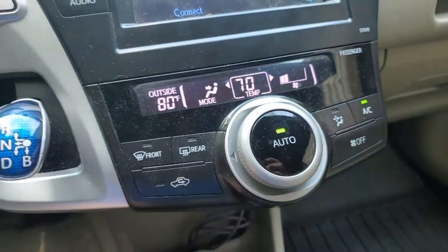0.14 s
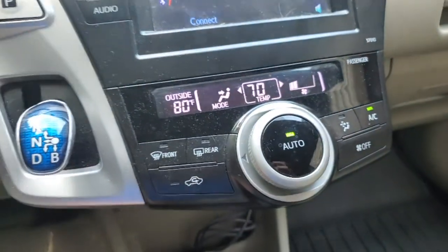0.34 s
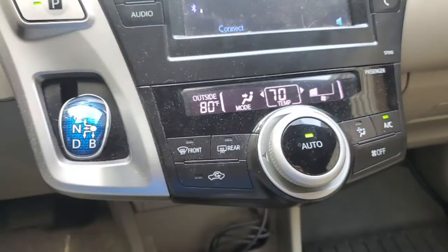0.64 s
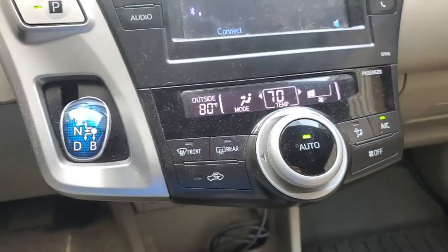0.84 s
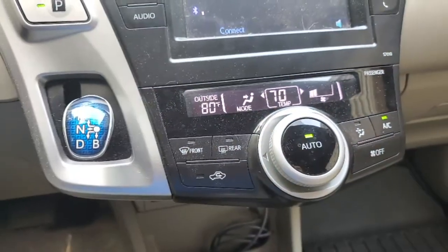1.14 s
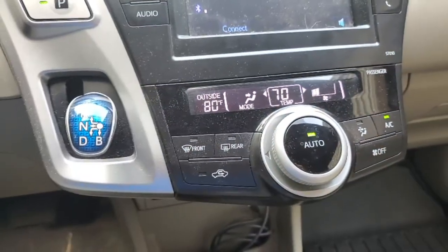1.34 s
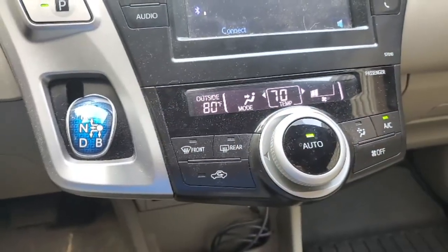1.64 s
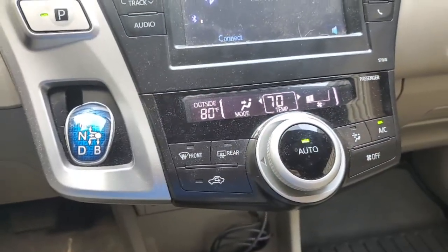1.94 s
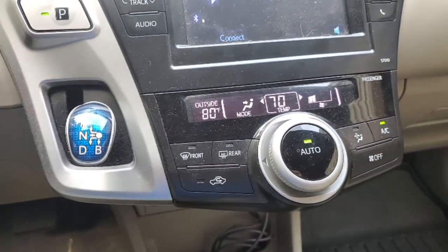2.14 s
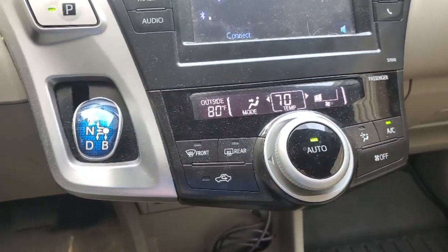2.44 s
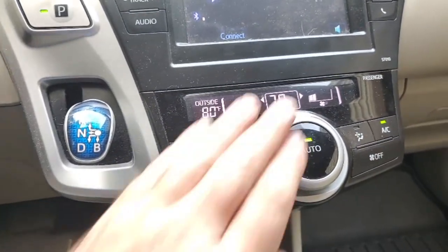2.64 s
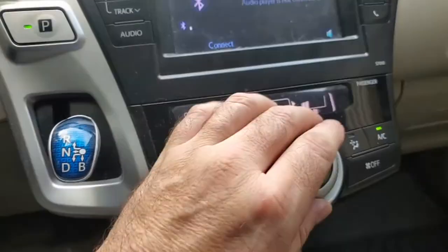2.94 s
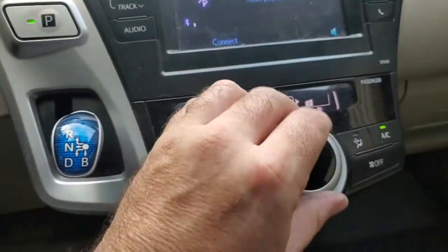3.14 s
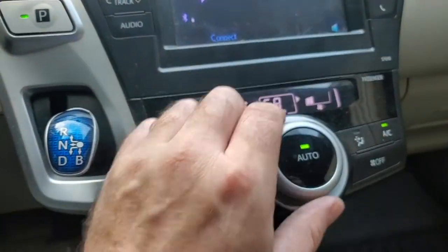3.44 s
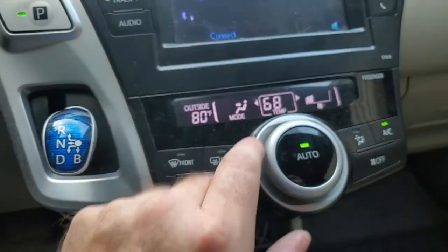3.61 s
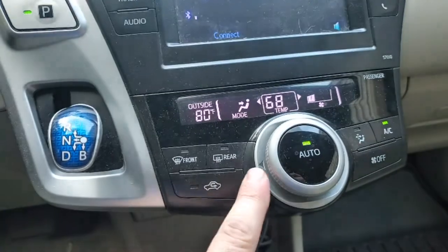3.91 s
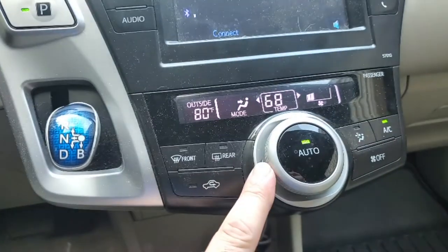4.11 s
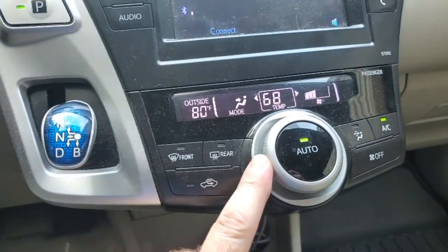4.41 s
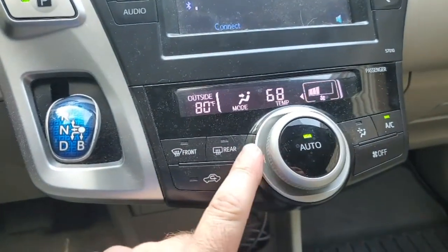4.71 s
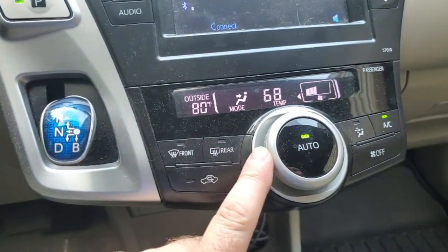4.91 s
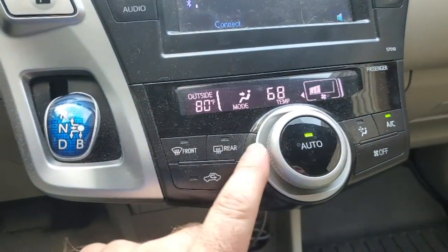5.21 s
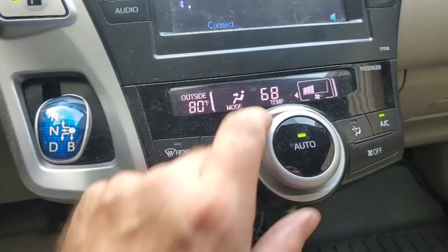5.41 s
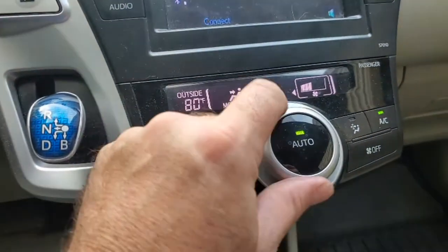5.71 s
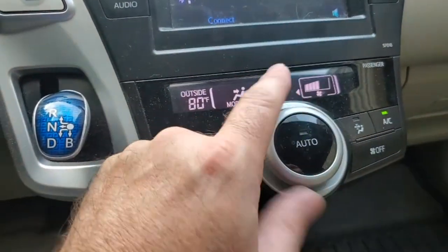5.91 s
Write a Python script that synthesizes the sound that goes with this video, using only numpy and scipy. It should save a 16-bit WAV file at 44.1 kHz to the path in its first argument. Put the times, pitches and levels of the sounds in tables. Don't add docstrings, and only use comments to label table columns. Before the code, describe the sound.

The inside of a parked car, heard close from a handheld stereo microphone, dry with a very short padded echo. A strong, very low compressor hum holds almost steady throughout, under a soft ducted rumble and gentle vent rush with a faint fan tone. Light skin or cloth brushing comes around 0.3 s, and a small bump with a tiny crackle at 0.6 s; faint rustles continue. From about 2.85 s fingertips tap and brush the panel, then a dial gives two sharp, bright plastic clicks at 3.25 and 3.35 s. Faint finger rubbing near 4 s precedes a soft double-contact button press at 4.55 s, released at 4.7 s, and a second at 5.1 s, released at 5.25 s. From 4 s the blower gradually speeds up, its tone climbing and air growing louder and brighter. A light touch at 5.7 s leads to two quick snaps near 5.85 and 5.9 s, while the airflow continues to the end.

```python
import sys
import numpy as np
from scipy import signal
from scipy.fft import rfft, irfft, next_fast_len
from scipy.io import wavfile
from scipy.ndimage import uniform_filter1d, map_coordinates

SR = 44100
rng = np.random.default_rng(int(sys.argv[2]) if len(sys.argv) > 2 else 0)


def natural_amplitude(level_db):
    exponent = np.asarray(level_db, float) / 20
    return 10 ** exponent


def log_audio(samples):
    frames = np.atleast_2d(samples).T
    limited = np.clip(frames, -1, 1)
    pcm = np.round(limited * 32767).astype(np.int16)
    wavfile.write(sys.argv[1], SR, pcm)


N = 266937

QUIET_TOP_HZ, EDGE_HZ = 15780, 120


def unit(x):
    return x / np.sqrt(np.mean(x ** 2) + 1e-20)


def along(points, hz):
    f, v = np.transpose(points)
    return np.interp(np.log(hz + 1), np.log(f + 1), v)


def curves(rows):
    s, *cols = np.transpose(rows)
    return [np.interp(np.arange(N) / SR, s, c) for c in cols]


def wobble(rate):
    knots = rng.standard_normal(int(N * 40 / SR) + 4)
    return map_coordinates(knots, [np.arange(N) * min(rate, 40) / SR])


def filtered(x, response):
    n = x.shape[-1]
    m = next_fast_len(n + 4096)
    return irfft(rfft(x, m) * response(np.fft.rfftfreq(m, 1 / SR)), m)[..., :n]


def band(x, lo_hz, hi_hz):
    sos = signal.butter(2, [lo_hz, hi_hz], "bandpass", fs=SR, output="sos")
    return unit(signal.sosfilt(sos, x))


def rush(spectrum, alike, patchy_db):
    z = signal.stft(rng.standard_normal((2, N)), nperseg=512)[2]
    field = uniform_filter1d(rng.standard_normal(z.shape[1:]), size=6, axis=0)
    field = uniform_filter1d(field, size=14, axis=1)
    pair = signal.istft(z * natural_amplitude(patchy_db * unit(field)), nperseg=512)[1][:, :N]

    def mid_side_gain(hz):
        turn = np.arccos(np.clip(along(alike, hz), -1, 1)) / 2
        return natural_amplitude(along(spectrum, hz)) * [np.cos(turn), np.sin(turn)]

    mid, side = filtered(pair, mid_side_gain)
    return unit(np.array([mid + side, mid - side]))


def add(track, s, sound, pan_db):
    start = round(s * SR)
    track[:, start:start + sound.shape[-1]] += sound * natural_amplitude([[pan_db / 2], [-pan_db / 2]])


def compressor():
    # t/s, level/dB
    load = [(0.12, -22.5), (0.15, -22.5), (1.7, -21.5), (1.73, -22), (2.24, -21), (2.28, -23), (2.86, -21),
            (3.53, -22.5), (5.71, -22), (5.9, -21.5)]
    # multiple of the shaft speed, level/dB, drift/dB
    overtone_table = [(2, -22, 1.5), (3, -31, 2.5), (4, -35, 1.5), (6, -34, 2.5), (7, -31, 1.2),
                      (9, -37, .8)]
    # t/s, f/Hz
    shaft = [
        (0, 43.3),
        (.7, 43.3),
        (.9, 43.41),
        (3.3, 43.42),
        (3.5, 43.26),
        (4.2, 43.26),
        (4.4, 43.37),
        (6.05, 43.37),
    ]
    start_angle = 2.75
    shaft_hz = curves(shaft)[0] + 0.04 * wobble(3.04)
    turn = 2 * np.pi * np.cumsum(shaft_hz) / SR + start_angle
    tones = np.sin(turn)
    for k, db, drift_db in overtone_table:
        tones = tones + natural_amplitude(db + drift_db * wobble(5.8)) * np.sin(k * turn + rng.uniform(0, 7.42))
    buzz = natural_amplitude([[-60], [-50]]) * natural_amplitude(1.5 * wobble(4)) * np.sin(25 * turn)
    hum_db = curves(load)[0] + .3 * wobble(6)
    return np.sqrt(2) * natural_amplitude(hum_db) * (tones + buzz) * natural_amplitude([[-.1], [.1]])


def blower():
    # f/Hz, level/dB per Hz
    duct = [(15, -29.5), (30, -16), (60, -16.5), (95, -14), (130, -15), (160, -24), (190, -27), (250, -23),
            (290, -22.5), (325, -24.5), (342, -30), (420, -39), (520, -40), (800, -96)]
    # f/Hz, level/dB per Hz
    vents = [(300, -13.5), (420, -6), (520, -12.5), (610, -4.5), (700, -9.5), (830, -7), (1000, -15.5),
             (1250, -18.5), (1750, -21.5), (2050, -26.5), (2600, -31.5), (3200, -31), (3800, -36.5),
             (6500, -59)]
    # f/Hz, likeness (1 = same)
    alike = [(60, .98), (130, .92), (290, .87), (500, .9), (800, .85), (1100, .3), (1500, .05), (4000, .08)]
    # t/s, f/Hz
    wheel_speed = [
        (0, 278),
        (3.9, 277),
        (4.4, 292),
        (4.85, 305),
        (5.3, 318),
        (5.7, 326),
        (6.05, 328),
    ]
    idle_hz = 277
    wheel_hz, = curves(wheel_speed)
    speed_db = 20 * np.log10(wheel_hz / idle_hz)
    rumble_db = -40 + 2.54 * speed_db
    rush_db = -51 + 3.56 * speed_db
    bright_db = 0.5 + 3.4 * speed_db
    tone_db = -54.5 + 2.6 * speed_db

    swell = wobble(2.1)
    rumble = natural_amplitude(rumble_db + 0.4 * swell) * rush(duct, alike, patchy_db=1.42)
    vent = rush(vents, alike, patchy_db=1.19)
    top = filtered(vent, lambda hz: 1 / (1 + (1900 / (hz + 1)) ** 6))
    air_gain = natural_amplitude(rush_db + .35 * swell + 0.13 * wobble(11))
    air = air_gain * (vent - top + natural_amplitude(bright_db) * top)

    angle = 2 * np.pi * np.cumsum(wheel_hz) / SR
    wheel = natural_amplitude(tone_db + 1.5 * wobble(3.7)) * np.sin(angle)
    motor = natural_amplitude(tone_db - 3 + 3.4 * wobble(3)) * np.sin(.775 * angle)
    return rumble + air + wheel + motor


def dial():
    # t/s, peak level/dB, left over right/dB, ring/dB, settling/dB
    detents = [
        (3.24, -21.5, -3.5, 0.5, -8),
        (3.3548, -20, 1.5, 2, -9),
        (5.853, -19.5, -0.5, 0.5, -10.5),
        (5.9162, -18.5, 1.5, 0, -10.5),
    ]
    ring_hz = [980, 1400, 1980, 2790, 3365, 4300, 4870, 5650, 6500, 8500, 11000, 12800]
    # turned one way left/dB, right/dB, turned back left/dB, right/dB, t60/s
    knob_modes = [(-7, -10, -13, -10, 0.052), (-11, -9, -26, -18, 0.034), (-24, -24, -16, -7, .035),
                  (-12, -23, -5, -8, 0.021), (-5, 5.5, 5.5, 4, 0.031), (-1, 3.5, -9, -3.5, 0.014),
                  (-12, -11, -8, -6, 0.028), (-11, -2, -14, -10, .028), (-14, -7, -13, -20, .035),
                  (-8, -1, -22, -15, .03), (-6, -5.5, -8, -3.5, 0.024), (-9, -6, -21, -10, .022)]
    # f/Hz, level/dB per Hz
    snap = [(410, -28), (850, -14), (1000, -10.5), (1830, -15.5), (2200, -20), (3360, -13), (4800, -13.5),
            (6330, -11.5), (6940, -13), (8600, -11), (10500, -15), (12400, -14), (15600, -21.5),
            (16300, -20)]
    # f/Hz, level/dB per Hz
    snap_back = [(410, -33), (700, -9.5), (1400, -12), (2200, -19.5), (2800, -13.5), (3940, -10),
                 (5000, -14), (6330, -10.5), (7500, -13.5), (8600, -16), (10900, -8), (12600, -21),
                 (15600, -22), (16300, -27)]
    # f/Hz, level/dB, t60/s
    bezel_modes = [(3330, -20, .065), (3425, -23, .06), (6500, -27, .05)]
    # t/s, level/dB
    catches = [
        (3.228, -53),
        (5.8425, -48),
    ]
    chatter_t60, settle_t60 = 0.031, 0.079
    slip_s, slip_sag_db = .0065, 4
    grip_damping = .24
    unlike = .45
    track, t = np.zeros((2, N + SR)), np.arange(SR // 8) / SR

    for k, (s, db, pan_db, ring_db, settle_db) in enumerate(detents):
        back = k // 2
        chatter = natural_amplitude(-60 * t / chatter_t60) + natural_amplitude(settle_db - 60 * t / settle_t60)
        chatter = (1 - np.exp(-t / 0.00094)) * chatter
        noise = rng.standard_normal((2, len(t))) + 1.1 * rng.standard_normal(len(t))
        hiss = unit(filtered(noise, lambda hz: natural_amplitude(along([snap, snap_back][back], hz))))

        ring = np.zeros((2, len(t)))
        for hz, (*levels, t60) in zip(ring_hz, knob_modes):
            both_db = np.c_[levels[2 * back:][:2]]
            fade_db = 60 * np.maximum(t - slip_s, 0) / (t60 * grip_damping)
            cycles = hz * t + rng.random() + unlike * rng.random((2, 1))
            ring += natural_amplitude(both_db - fade_db) * np.sin(2 * np.pi * cycles)
        drive = natural_amplitude(slip_sag_db * (.5 - np.minimum(t / slip_s, 1)))
        rattle = 1 + [.22, .35][back] * band(rng.standard_normal(len(t)), 60, 680)
        ring = ring * (1 - np.exp(-t / 0.00055)) * drive * rattle
        add(track, s, natural_amplitude(db - 2.0) * (0.64 * chatter * hiss + natural_amplitude(ring_db - 12.0) * ring), pan_db)

        bezel = np.zeros((2, len(t)))
        for hz, level, t60 in bezel_modes:
            bezel += natural_amplitude(level - 60 * t / t60) * np.sin(2 * np.pi * (hz * t + rng.random((2, 1))))
        add(track, s, natural_amplitude(db - 18 * back) * (1 - np.exp(-t / .004)) * bezel, pan_db - 8)

    for s, db in catches:
        ping = natural_amplitude(db - 60 * t / .03) * (1 - np.exp(-t / .001)) * np.sin(2 * np.pi * 4250 * t)
        add(track, s, ping, -4)
    return track[:, :N]


def fingers():
    # t/s, peak level/dB, low part/dB, high part/dB
    touches = [(2.854, -41, 8.5, -16), (2.9596, -43.5, -3, -20), (3.0157, -52, 14.5, -6),
               (3.199, -57, 6, -1), (3.3153, -39, -2, -20), (3.47, -55, 12, -13), (4.183, -55.5, 18.5, -12),
               (4.528, -46, 6, -31), (4.639, -49.5, 8, -9.5), (5.709, -45.5, 4, -12)]
    # t/s, peak level/dB, second contact after/s, its level over the first/dB, high part/dB
    presses = [
        (4.5515, -32.5, .015, -5.5, -15.5),
        (5.104, -39.5, 0.0056, 2, -23.5),
    ]
    releases = [
        (4.685, -38.5, 0.008, 3.5, -9.5),
        (5.2366, -37, .0035, 2.7, -8),
    ]
    second_high = [4, 1, -10, -7]
    # f/Hz, level/dB, delay/s, t60/s
    rebound = [(310, -32, .008, .045), (410, -35, .012, .035), (500, -32, .013, .04), (590, -35, .015, .03),
               (4150, -38, .009, .014)]
    rebound_top = [1, .86]
    track, t = np.zeros((2, N + SR)), np.arange(SR // 6) / SR

    # t/s, peak, low, high, 5-6 kHz body (all dB), t60/s, attack/s
    puffs = [(*row, -12, 0.053, .0019) for row in touches]
    for (s, db, lag, more_db, high_db), second_db in zip(presses + releases, second_high):
        puffs.append((s, db + 1.5, 2.5, high_db, -5.5, 0.037, 0.0013))
        puffs.append((s + lag, db + 1.5 + more_db, 2.5, high_db + second_db, -5.5, 0.037, 0.0013))

    for s, db, low_db, high_db, body_db, t60, attack in puffs:
        low, mid, body, high = rng.standard_normal((4, 2, len(t))) + rng.standard_normal((4, 1, len(t)))
        puff = band(mid, 2750, 4800) + natural_amplitude(low_db) * band(low, 630, 1880)
        puff = puff + natural_amplitude(body_db) * band(body, 4900, 6800)
        treble = band(high, 6500, 11800) + natural_amplitude(-5) * band(high, 14500, 16400)
        puff = puff + natural_amplitude(high_db + 11.0) * unit(treble)
        add(track, s, natural_amplitude(db - 8.5 - 60 * t / t60) * (1 - np.exp(-t / attack)) * puff, 0)

    for (s, *_), top in zip(releases, rebound_top):
        for hz, db, delay, t60 in rebound:
            pitch = hz * (top if hz > 1000 else 1)
            add(track, s + delay, natural_amplitude(db - 60 * t / t60) * np.sin(2 * np.pi * pitch * t), 0)
    return track[:, :N]


def hand():
    # t/s, level/dB
    sleeve = [(0, -72), (.9, -68), (1.4, -70), (2.4, -71.5), (2.8, -61.5), (3.2, -69), (3.7, -67.5),
              (4.4, -69.5), (5.4, -67.5), (5.75, -63.5), (6.05, -66)]
    # f/Hz, level/dB per Hz
    cloth_colour = [(1200, -23.5), (2200, 1), (4500, -2), (5800, -1), (7000, -2.5), (9900, -7.5),
                    (10500, -3.5), (11600, -5.5), (12500, -8.5), (14400, -11), (16000, -7)]
    # t/s, half length/s, level/dB, centre f/Hz, width/octaves
    brushes = [(0.325, 0.09, -55, 3200, 1.54), (0.32, .06, -56.5, 2800, .75), (.272, .02, -60, 3400, .7),
               (.39, .03, -63, 4200, .8), (2.965, .003, -61, 4200, .1), (2.963, .003, -63, 5600, .15),
               (0.649, 0.038, -56, 9600, 4.1), (.665, .045, -63.5, 3300, .6),
               (0.865, 0.025, -67.5, 6180, 0.68), (0.98, 0.22, -72, 3180, 0.09),
               (1.05, 0.041, -68.5, 7940, 1.1), (1.38, 0.015, -66, 8130, 0.88),
               (1.632, 0.027, -61.5, 10840, 1.6), (2.947, 0.039, -62, 10970, 0.85),
               (3.084, 0.024, -66.5, 10900, 0.51), (3.313, 0.018, -58, 8050, 3.6),
               (3.312, .006, -58, 13000, .3), (3.487, 0.012, -59, 5600, 0.75),
               (3.482, .009, -64, 11000, .3), (3.658, 0.04, -62.5, 11650, 0.46),
               (2.905, .012, -63, 3600, .25), (5.732, 0.0054, -59, 3500, .25),
               (3.024, .004, -63, 5700, .06), (5.891, .012, -55, 9000, 1.2),
               (5.719, 0.017, -59.5, 10830, 0.99)]
    # t/s, level/dB
    rubs = [
        (3.985, -76),
        (4.04, -80),
        (4.062, -79),
        (4.105, -78),
        (4.87, -77),
    ]
    level_db, = curves(sleeve)
    cloth = rush(cloth_colour, [(3000, 0.13)], patchy_db=0.5)
    top = filtered(cloth, lambda hz: 1 / (1 + (8000 / (hz + 1)) ** 8))
    cloth = cloth - top + natural_amplitude(-2.5) * top
    track = np.pad(natural_amplitude(level_db + .8 * wobble(12)) * cloth, ((0, 0), (0, SR)))

    strokes = list(brushes)
    for s, db in rubs:
        for hz, more_db in ((5900, 9), (11000, 2)):
            strokes.append((s, 0.016, db + more_db, hz, 0.1))
    t = np.arange(SR // 2) / SR
    drag = natural_amplitude(.5 * np.pad(wobble(35), (0, SR)))
    for s, half, db, centre_hz, octaves in strokes:
        colour = lambda hz: np.exp(-.5 * (np.log2((hz + 1) / centre_hz) / octaves) ** 2)
        start = max(s - .25, 0)
        stroke = np.exp(-.5 * ((t + start - s) / half) ** 2) * drag[round(start * SR):][:len(t)]
        noise = unit(filtered(rng.standard_normal((2, len(t))), colour))
        add(track, start, natural_amplitude(db) * stroke * noise, 0)
    return track[:, :N]


def grip():
    # t/s, jolt/dB, crackle/dB
    slips = [
        (0.5906, -27.5, -38.5),
    ]
    creep_s, recover_s = .004, 0.0014
    crackle_lead_s, crackle_s = 0.0018, 0.00036
    track, t = np.zeros((2, N + SR)), np.arange(-SR // 50, SR // 50) / SR
    for s, jolt_db, crackle_db in slips:
        creep = np.clip(1 + t / creep_s, 0, 1) / 2
        jolt = np.where(t < 0, creep, -np.exp(-abs(t) / recover_s) / 2)
        burst = np.exp(-.5 * ((t + crackle_lead_s) / crackle_s) ** 2)
        crackle = burst * band(rng.standard_normal(len(t)), 5800, 13000)
        add(track, s + t[0], natural_amplitude(jolt_db) * jolt + natural_amplitude(crackle_db) * crackle, 0)
    return track[:, :N]


def cabin(x):
    # f/Hz, t60/s
    ring_time = [(500, .09), (3300, .075), (12000, .06)]
    hz, t, z = signal.stft(rng.standard_normal((2, SR // 5)), SR, nperseg=128)
    fade = natural_amplitude(-60 * t / along(ring_time, hz)[:, None])
    tail = signal.istft(z * fade, SR, nperseg=128)[1]
    return signal.fftconvolve(x, tail / np.linalg.norm(tail[0]), axes=1)[:, :N]


def whine():
    whine_hz = [15003, 15735]
    # left/dB, right/dB
    whine_levels = [(-73.5, -101), (-97, -82.5)]
    t, tones = np.arange(N) / SR, np.zeros((2, N))
    for hz, (left_db, right_db) in zip(whine_hz, whine_levels):
        gain = natural_amplitude([left_db + 3 * wobble(14), right_db + 4 * wobble(11)])
        tones += np.sqrt(2) * gain * np.sin(2 * np.pi * hz * t)
    skirt = filtered(rng.standard_normal(N), lambda hz: np.exp(-.5 * ((hz - whine_hz[0]) / 230) ** 2))
    tones[0] += natural_amplitude(-85 + 4 * wobble(16)) * unit(skirt)
    return tones


def scene():
    soft = lambda x: filtered(x, lambda hz: np.clip((QUIET_TOP_HZ - hz) / EDGE_HZ + .5, 0, 1))
    controls = dial() + soft(fingers())
    background = soft(blower() + hand() + grip())
    return compressor() + background + controls + natural_amplitude(-7.5) * cabin(controls)


def top_cut(x):
    return signal.sosfilt(signal.butter(12, 16490, fs=SR, output="sos"), x)


def record(dry):
    # f/Hz, gain/dB
    port_l = [(45, .5), (70, 1.5), (170, -1.5), (300, 0), (1000, 2), (3000, -1), (4000, -4.5), (5300, -5.5),
              (5900, -9.5), (7000, -21), (7500, -24.5), (8100, -5), (11000, -6), (15000, 4)]
    # f/Hz, gain/dB
    port_r = [(300, 0), (1000, 3.5), (2500, 1), (3250, 4), (3800, 3.5), (6500, 3.5), (8800, -3), (11000, 6),
              (13000, 1.5), (15000, 1.5)]
    top_hz = 16450

    def ports(hz):
        colour = natural_amplitude([along(port_l, hz), along(port_r, hz)])
        shelf = natural_amplitude(-15 * np.clip((hz - QUIET_TOP_HZ) / (4 * EDGE_HZ), 0, 1))
        return colour * shelf * np.clip((top_hz - hz) / EDGE_HZ, 0, 1)

    longer = np.pad(dry, ((0, 0), (SR, SR)), "reflect", reflect_type="odd")
    heard = filtered(longer, ports)[:, SR:-SR]
    stop = np.clip((N - np.arange(N)) / 200, 0, 1)
    return top_cut(stop * (heard + whine()))


dry = scene()
out = record(dry)
log_audio(out)
```